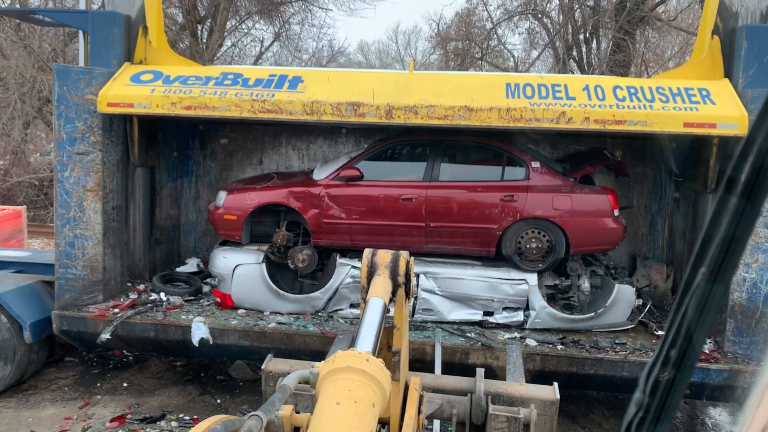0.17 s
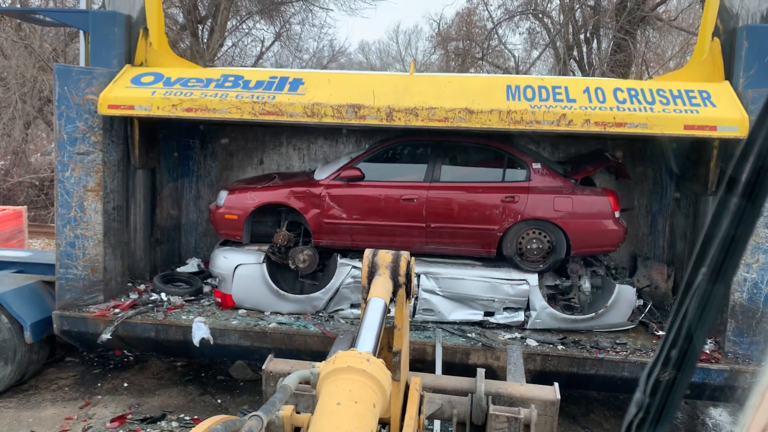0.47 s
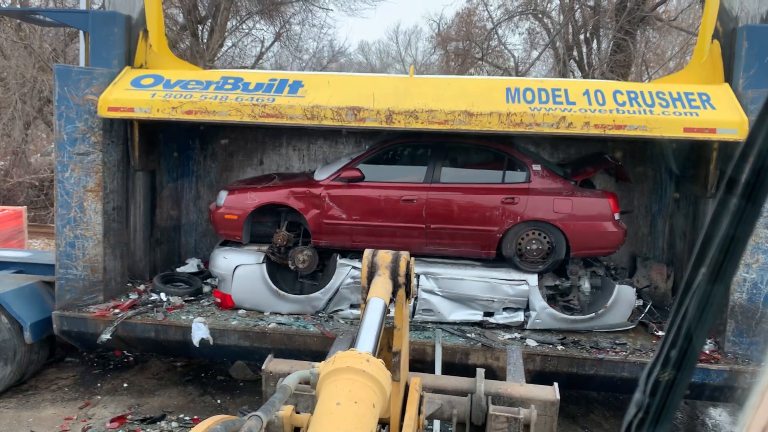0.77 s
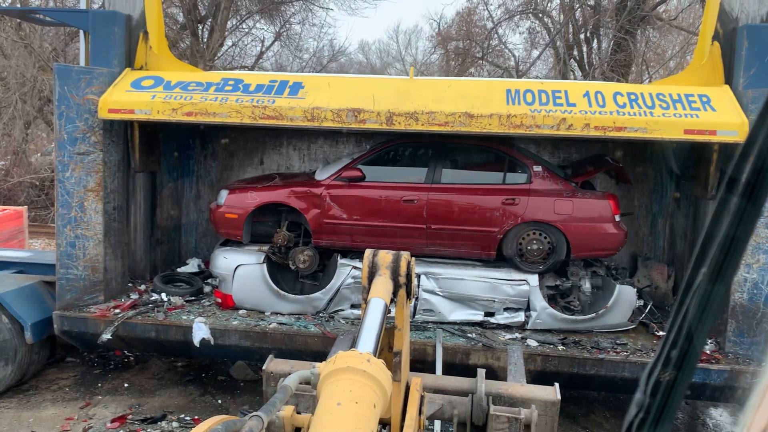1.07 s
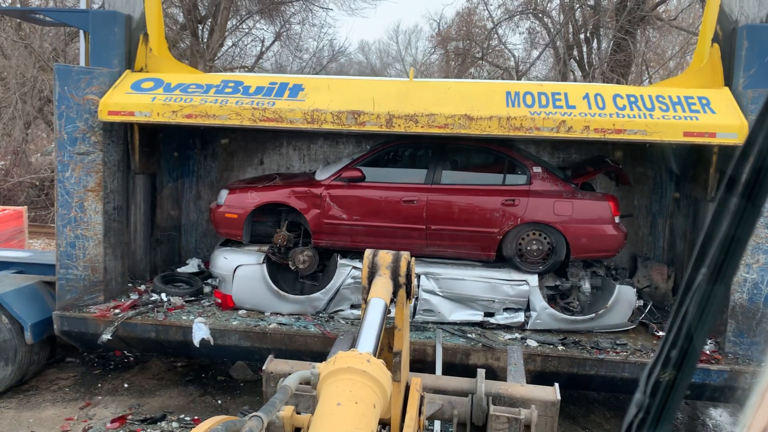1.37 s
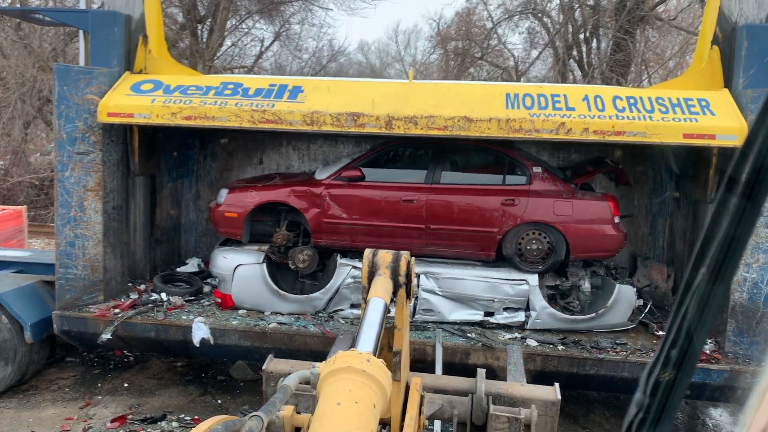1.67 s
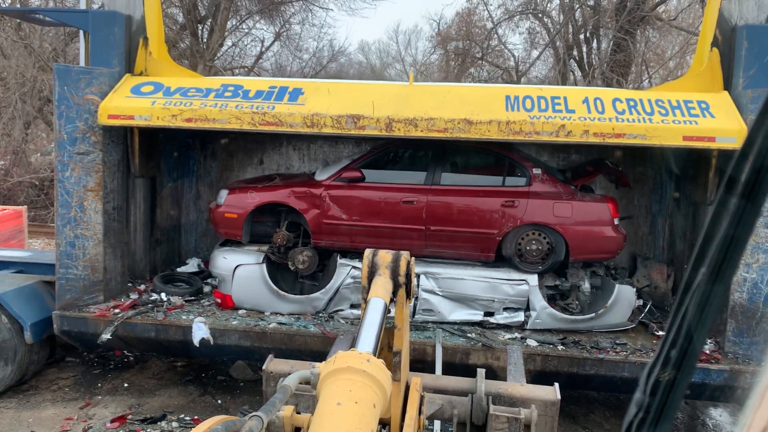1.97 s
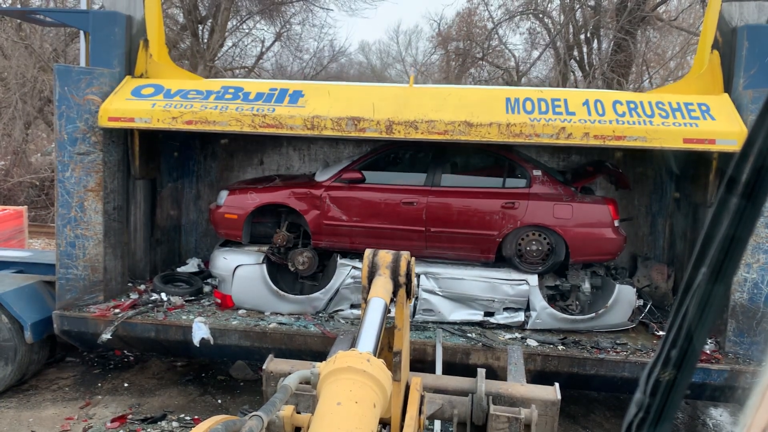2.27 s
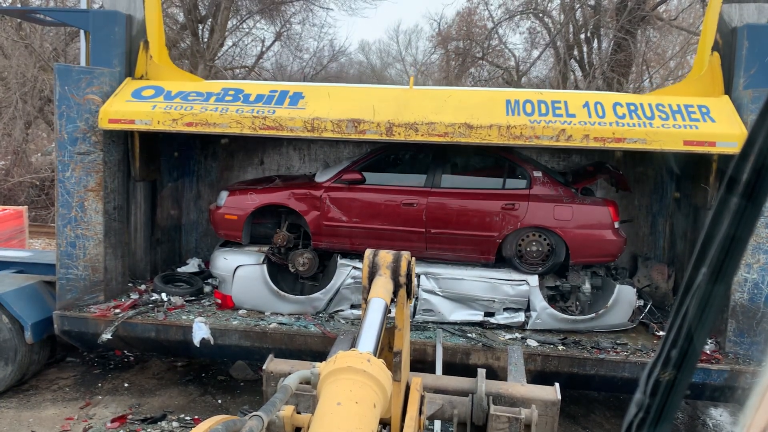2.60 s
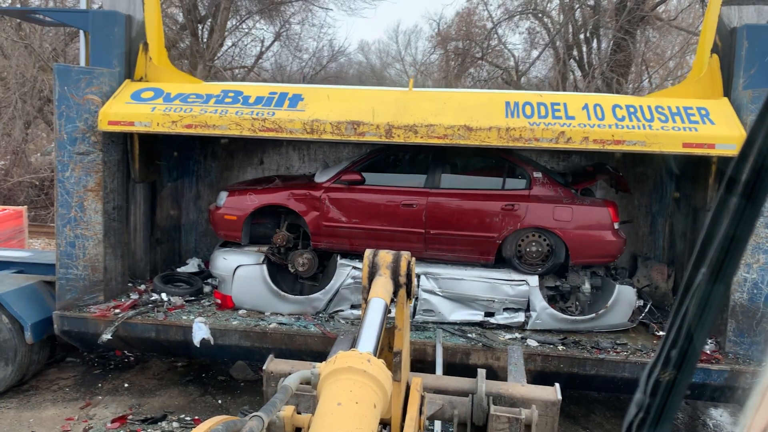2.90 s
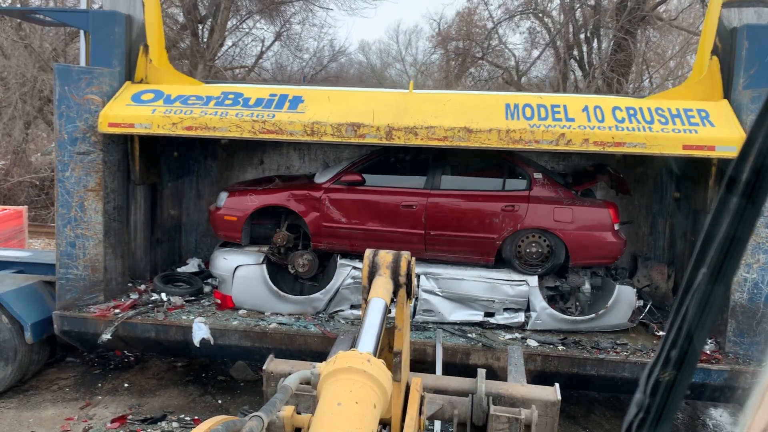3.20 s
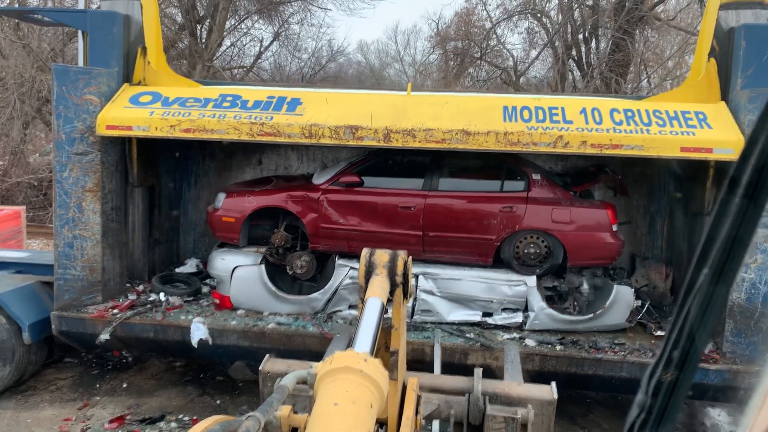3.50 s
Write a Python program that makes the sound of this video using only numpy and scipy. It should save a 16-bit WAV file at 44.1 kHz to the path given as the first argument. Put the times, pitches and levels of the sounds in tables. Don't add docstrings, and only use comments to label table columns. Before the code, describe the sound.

A heavy loader diesel idles close to the microphone, a deep throbbing rumble with rattly cab roar, while a press engine drones steadily across the yard. A dull car-body thud comes at 0.9 seconds, sharper metal cracks at 1.6, 2.3, 2.5 and 2.9. From about 3.1 the engine revs up, booming through the cab, with a short wavering metal squeal near 3.3, still climbing at the end.

```python
import sys
import numpy as np
from scipy import signal
from scipy.fft import rfft, irfft, next_fast_len
from scipy.io import wavfile
from scipy.ndimage import uniform_filter1d

SR = 44100
rng = np.random.default_rng(int(sys.argv[2]) if len(sys.argv) > 2 else 0)


def materialize(psi):
    bounded = np.clip(np.atleast_2d(psi).T, -1, 1)
    quanta = np.round(bounded * 32767).astype(np.int16)
    wavfile.write(sys.argv[1], SR, quanta)


def gain_from_decibels(decibels):
    exponent = np.asarray(decibels, float) / 20
    return 10 ** exponent


N = 160965


def evened(x):
    return x / np.sqrt(np.mean(x ** 2) + 1e-20)


def read(points, hz):
    f, value = np.transpose(points)
    return np.interp(np.log(hz + 1), np.log(f + 1), value)


def curve(points, t, axis=1):
    return np.interp(t, [p[0] for p in points], [p[axis] for p in points])


def humps(table, hz):
    return sum(db * np.exp(-.5 * ((hz - f) / width_hz) ** 2) for f, width_hz, db in table)


def drift(rate_hz):
    t = np.arange(0, N / SR, .004)
    partials_hz = np.geomspace(.3, rate_hz, num=16)
    slow = sum(np.sin(2 * np.pi * (f * t + rng.random())) / np.sqrt(f) for f in partials_hz)
    return np.interp(np.arange(N) / SR, t, evened(slow))


# [t/s, speed/idle speed]
SPEED = [(0, 1.0), (1.9, 1.0015), (3.12, 1.0), (3.175, 1.04), (3.225, 1.125), (3.29, 1.21), (3.34, 1.26),
         (3.41, 1.345), (3.455, 1.385), (3.5, 1.41), (3.57, 1.46), (3.65, 1.54)]


def shaft():
    idle_hz = 20.67
    hz = idle_hz * uniform_filter1d(curve(SPEED, np.arange(N) / SR), size=1500)
    load = np.clip(hz / hz[0] - 1, 0, .25) * 4
    return hz, np.cumsum(hz) / SR, load


# [shaft multiple, level/dB]
LOADER = [(2, -25.5), (3, -42.5), (3.5, -53), (4, -25.5), (5, -46.5), (6, -54), (7, -50), (8, -24),
          (10, -44), (12, -53), (14, -63), (16, -55), (24, -58.5), (32, -66.5), (56, -59.5), (80, -66.5)]
# [f/Hz, width/Hz, level/dB]
CAB = [(53.3, 10, -6.5), (60, 2.1, -12.5), (93, 8.7, -4.5), (125, 15, -7.5), (189.3, 4.3, -7.5),
       (205.6, 9.4, 3.5), (219.2, 5, -4.5), (239.4, 28, -5), (322.7, 35, -12), (342.4, 3, 10.5),
       (392, 10, 11.5), (408, 9.1, -6), (430, 8, -1), (453, 7.2, 5.5), (530, 11, 5), (563, 21, 18),
       (604, 11, 8.5), (630, 16, -3), (665, 15, 5.5), (736, 40, -5.5)]
WAVER_DB, WAVER_HZ = 0.22, 8


def loader_orders(hz, turns, load):
    load_rough_db, load_odd_db, slip_turns = 3.6, 2.5, .009
    out = np.zeros(N)
    for order, db in LOADER:
        k = round(2 * order) / 2
        waver, shake = drift(WAVER_HZ), drift(28)
        level_db = db + humps(CAB, k * hz) - humps(CAB, k * hz[0])
        level_db += WAVER_DB * waver
        level_db += load_rough_db * np.sqrt(load * k / 8) * shake
        level_db += load_odd_db * load * (k % 2 > 0)
        phase_turns = k * (turns + slip_turns * load * shake) + rng.random()
        out += np.sqrt(2) * gain_from_decibels(level_db) * np.sin(2 * np.pi * phase_turns)
    return out


FAN_DB = [-47, -61, -61]


def fan(turns):
    passes_per_turn = 7.338
    out = np.zeros(N)
    for k, db in enumerate(FAN_DB, 1):
        level = gain_from_decibels(db + WAVER_DB * drift(WAVER_HZ))
        out += np.sqrt(2) * level * np.sin(2 * np.pi * k * passes_per_turn * turns)
    return out


# [t/s, length/s, f/Hz, level/dB]
BOOMS = [(-.25, 1.0, 662, -53), (-.4, 1.4, 1160, -57), (.862, .11, 292, -39), (.875, .07, 450, -49),
         (.872, .065, 1530, -52), (3.035, .03, 2100, -51), (3.28, .07, 735, -47), (3.295, .05, 870, -47),
         (3.295, .04, 1170, -48), (3.28, .105, 93, -12.5), (3.39, .1, 92, -21), (3.46, .07, 155, -24),
         (3.52, .16, 90, -21), (3.56, .09, 48, -28)]


def panel_booms():
    t = np.arange(N) / SR
    out = np.zeros(N)
    for start_s, length_s, boom_hz, db in BOOMS:
        swell = np.sin(np.pi * np.clip((t - start_s) / length_s, 0, 1))
        out += np.sqrt(2) * gain_from_decibels(db) * swell * np.sin(2 * np.pi * boom_hz * (t - start_s))
    return out


# [f/Hz, correlation]
SAME = [(60, 1), (230, .96), (400, .3), (1150, .55), (2300, .35), (3100, .55), (5000, .45), (7200, .6),
        (8400, .95)]


def hiss(shape_db, size, patchy_db):
    frames, hz = N // (size // 4) + 5, np.fft.rfftfreq(size, 1 / SR)
    a, b, c, d, patches = rng.standard_normal((frames, len(hz), 5)).T
    patches = uniform_filter1d(patches, size=10, axis=0)
    patches = evened(uniform_filter1d(patches, size=12, axis=1))
    same = np.clip(read(SAME, hz), 0, 1)[:, None]
    left = a + 1j * b
    right = same * left + np.sqrt(1 - same ** 2) * (c + 1j * d)
    hz, t = hz[:, None], np.arange(frames) * size / 4 / SR
    level_db = shape_db(hz, t) + patchy_db * (1.5 + hz / 4000) * patches
    z = np.array([left, right]) * gain_from_decibels(level_db)
    return evened(signal.istft(z, nperseg=size, noverlap=size * 3 // 4)[1][:, :N])


# [t/s, level/dB]
EFFORT = [
    (0, 2.5),
    (1.3, 2.5),
    (2, 3),
    (2.8, 3),
    (3.05, 3.5),
    (3.3, 4.5),
    (3.45, 4),
    (3.65, 5),
]
# [f/Hz, level/dB per Hz]
RUMBLE = [(22, -17), (35, 14), (60, 11), (105, 20.5), (150, 19), (230, 8), (330, 8.5), (500, -47.5)]


def frame_rumble():
    def shape_db(hz, t):
        band_db = read(RUMBLE, hz) - 60 * (hz < 20) - 120 * (hz > 1500)
        return band_db + 0.34 * curve(EFFORT, t)
    return gain_from_decibels(-36.5) * hiss(shape_db, size=4096, patchy_db=2.5)


# [f/Hz, level/dB per Hz]
ROAR = [(200, -21), (330, 1), (900, -4.5), (2700, -10), (4300, -19), (6800, -36.5), (7800, -42.5),
        (16000, -53)]
# [f/Hz, width/Hz, level/dB]
PANELS = [(303, 25, 2.5), (676, 87, 0.5), (1038, 11, -16), (1510, 66, 1), (2250, 67, -5.5), (2970, 23, 5.5),
          (3140, 190, -2), (3940, 120, 2), (4800, 1200, -2.5), (6400, 690, 4.5), (11900, 460, 1),
          (15100, 600, -6.5)]


def panel_roar(turns):
    treble_effort, knock = 2.04, 0.031

    def shape_db(hz, t):
        band_db = read(ROAR, hz) - 40 * (hz < 260) + humps(PANELS, hz)
        top_fade = np.clip((17000 - hz) / 5000, 0, 1)
        growth = 1 + (treble_effort - 1) * np.log2(hz / 1000 + 1) * top_fade
        return band_db + curve(EFFORT, t) * growth
    firing = 1 + knock * np.cos(2 * np.pi * 4 * turns)
    return gain_from_decibels(-45) * hiss(shape_db, size=1024, patchy_db=.9) * firing


# [t/s, level/dB, centre f/Hz, spread/octaves, t60/s]
CRACKS = [(.862, -39, 457, 0.6, 0.3), (1.561, -37.5, 890, 0.95, 0.13), (1.583, -38, 500, 1.2, 0.25),
          (1.719, -53, 6350, 0.29, 0.12), (1.799, -52.5, 5790, 0.54, 0.077),
          (2.256, -36.5, 3460, 1.4, 0.11), (2.272, -44, 1570, 0.5, 0.083), (2.527, -46.5, 3600, 1.1, 0.087),
          (1.733, -47.5, 2470, 0.65, 0.18), (1.975, -54.5, 3610, 0.86, 0.1), (2.361, -50, 890, 0.58, .2),
          (2.64, -51, 2220, 0.66, .25), (2.866, -40, 2180, 0.68, 0.14), (2.88, -54.5, 4110, 1, 0.077),
          (2.994, -52, 1950, 1.3, 0.31), (3.039, -52.5, 2740, 1.2, 0.12), (3.1, -53, 2210, 1.1, 0.14),
          (3.169, -46, 452, 0.49, 0.46), (3.28, -43, 777, 0.68, .3), (3.265, -58.5, 6130, 1.1, 0.17),
          (3.34, -53.5, 7010, 0.56, 0.19), (3.45, -56.5, 4000, 1.2, 0.27), (3.575, -52, 3020, 1.4, .2),
          (0.87, -48, 290, 0.54, 0.27), (.88, -48, 950, .5, 0.2), (1.567, -42.5, 322, .6, 0.22),
          (1.722, -65, 13500, .3, .08), (2.095, -57.5, 3500, 0.69, 0.092), (2.26, -42, 2630, 0.39, 0.16),
          (2.258, -53, 14100, 0.35, .12), (2.529, -44.5, 1900, .6, 0.11), (3.201, -47, 551, 0.5, 0.69),
          (3.401, -47, 332, .6, .8), (2.33, -42.5, 300, .4, .5), (3.16, -44, 332, .4, .3),
          (3.53, -43, 200.7, 0.48, .5)]
# [f/Hz, width/Hz, level/dB]
SHELL = [(308, 34, 9.5), (505, 130, 4.5), (756, 43, 4), (1500, 150, 1), (2260, 71, 2), (3980, 490, 5),
         (6300, 280, 7.5), (10100, 190, 5.5)]


def cracks():
    rise_s, hold = .002, 1.25
    size = SR // 2
    out = np.zeros((2, N + SR))
    t, hz = np.arange(size) / SR, np.fft.rfftfreq(size, 1 / SR) + 1
    for start_s, db, centre_hz, spread_oct, t60_s in CRACKS:
        splinters = evened(uniform_filter1d(rng.standard_normal(size), size=120))
        spray = rng.standard_normal((2, size)) * gain_from_decibels(1.5 * splinters)
        spray[1] = .75 * spray[0] + .66 * spray[1]
        band = np.exp(-.5 * (np.log2(hz / centre_hz) / spread_oct) ** 2)
        colour = band * gain_from_decibels(humps(SHELL, hz * rng.uniform(1.0, 1.03)))
        envelope = np.minimum(t / rise_s, 1) * gain_from_decibels(db - 60 * (t / t60_s) ** hold)
        snap = evened(irfft(rfft(spray) * colour, size)) * envelope
        out[:, round(start_s * SR):][:, :size] += snap
    return out[:, :N]


# [t/s, f/Hz, level/dB]
SQUEAL = [
    (3.17, 2775, -60.5),
    (3.235, 2740, -55.5),
    (3.255, 2650, -36.5),
    (3.278, 2760, -44.5),
    (3.305, 2760, -40.5),
    (3.32, 2830, -51),
    (3.345, 2700, -49),
    (3.366, 2650, -39.5),
    (3.42, 2670, -51.5),
]


def squeal():
    t = np.arange(N) / SR
    on = uniform_filter1d(1. * (t > SQUEAL[0][0]) * (t < SQUEAL[-1][0]), size=400)
    rough = 1 + 0.45 * evened(uniform_filter1d(rng.standard_normal(N), size=150))
    whistle = np.sin(2 * np.pi * np.cumsum(curve(SQUEAL, t)) / SR)
    return np.sqrt(2) * on * rough * gain_from_decibels(curve(SQUEAL, t, axis=2)) * whistle


# [shaft multiple, level/dB]
PRESS = [(2, -52.5), (4, -37), (7, -41), (8, -43.5), (9, -54.5), (10, -48.5), (14, -71), (16, -79),
         (18, -58), (20, -74), (24, -63.5), (27, -60.5), (28, -67.5), (34, -59), (36, -68), (39, -61.5),
         (40, -72), (67, -69.5), (68, -62), (70, -65), (98, -73), (124, -64.5)]


def press():
    shaft_hz, start_turns = 22.075, .07
    turns = np.cumsum(shaft_hz * (1 + .0008 * drift(1.9))) / SR + start_turns
    out = np.zeros(N)
    for k, db in PRESS:
        level = gain_from_decibels(db + 2.73 * drift(5.7))
        out += np.sqrt(2) * level * np.sin(2 * np.pi * (k * turns + rng.random()))
    return out


# [f/Hz, lead/rad]
PORT_LEAD = [(40, -.18), (83, -.4), (330, -.35), (420, -1.5), (480, 1.5), (700, 1.9), (950, 0),
             (1100, -2.9), (1400, -2.2), (2000, -.5), (2350, -2.8), (2650, -.7), (2950, -2.9), (3700, -3.6),
             (4000, -1.5), (4400, -.3)]
# [f/Hz, lead/rad]
PORT_TOP = [(4500, 0), (5400, -2.9), (6100, -5.9), (7500, -7.9), (8300, -9.1), (9100, -9.4), (10200, -12.2),
            (11900, -12.3), (12700, -15.3), (13800, -15.6), (14600, -18.3)]
# [f/Hz, L-R/dB]
PORT_DB = [(40, 1.9), (85, -0.9), (165, 0), (700, 1), (1200, -2), (2000, 1), (5000, -4.5), (8000, -0.5)]
# [f/Hz, width/Hz, level/dB]
MIC_DIPS = [(9340, 170, -1), (12300, 2300, -4), (15000, 600, -3.5)]


def ports(left, right):
    edge_hz, pad = 15780, 4096
    size = next_fast_len(N + 2 * pad)
    hz = np.fft.rfftfreq(size, 1 / SR)
    tilt = gain_from_decibels(read(PORT_DB, hz) / 2)
    turn = np.exp(-1j * (read(PORT_LEAD, hz) + read(PORT_TOP, hz)))
    mic = gain_from_decibels(humps(MIC_DIPS, hz)) * (hz < edge_hz)

    def through(x, response):
        x = np.pad(x, pad, mode="reflect", reflect_type="odd")
        return irfft(rfft(x, size) * response, size)[pad:pad + N]
    return np.array([through(left, mic * tilt), through(right, mic * turn / tilt)])


def scene():
    hz, turns, load = shaft()
    loader = loader_orders(hz, turns, load) + fan(turns) + panel_booms()
    body = frame_rumble() + panel_roar(turns)
    car = cracks() + squeal()
    left, right = loader + body + car + press()
    return ports(left, right)


def band_limit(x):
    return signal.sosfilt(signal.butter(12, 16580, fs=SR, output="sos"), x)


def record(dry):
    fade_in_s = .003
    mix = dry * np.minimum(np.arange(N) / SR / fade_in_s, 1)
    return band_limit(mix)


dry = scene()
out = record(dry)
materialize(out)
```